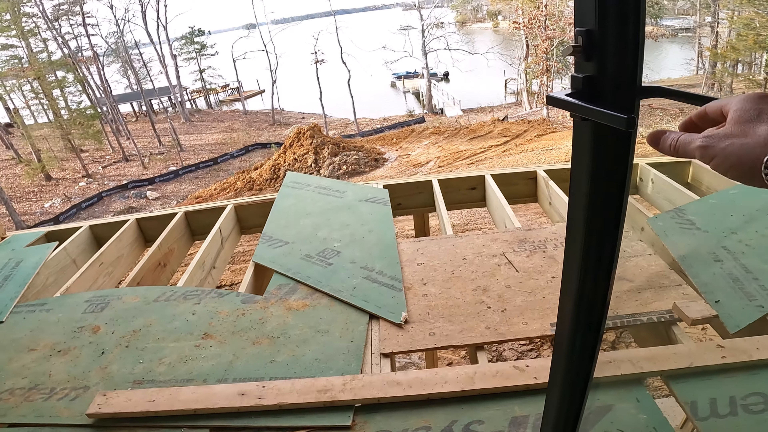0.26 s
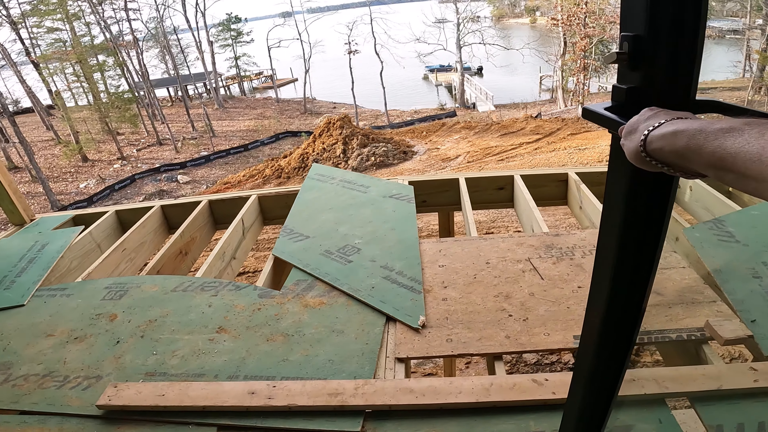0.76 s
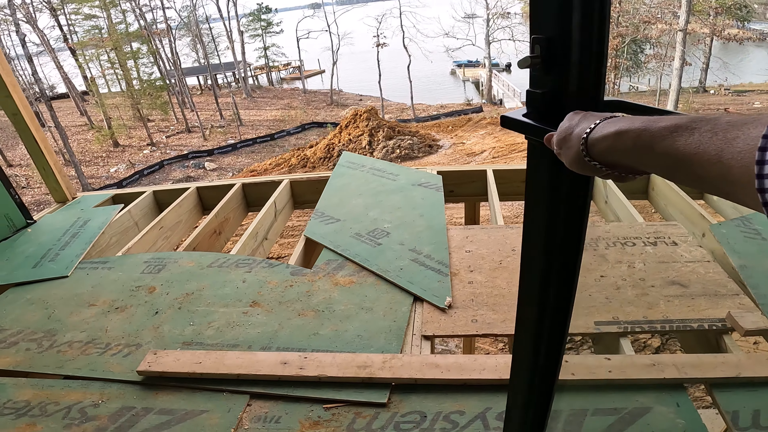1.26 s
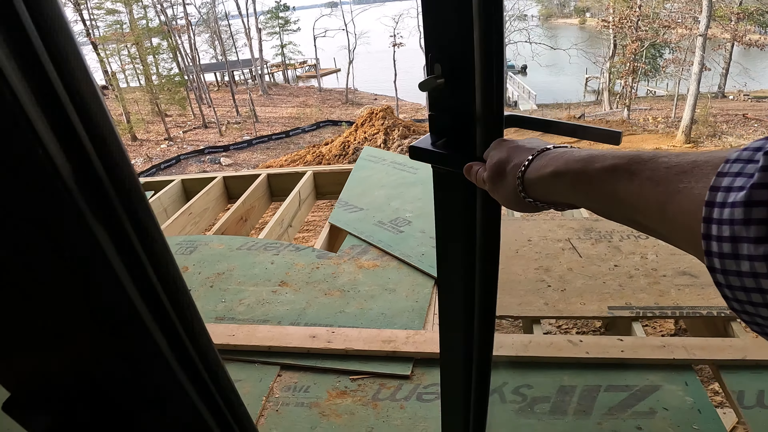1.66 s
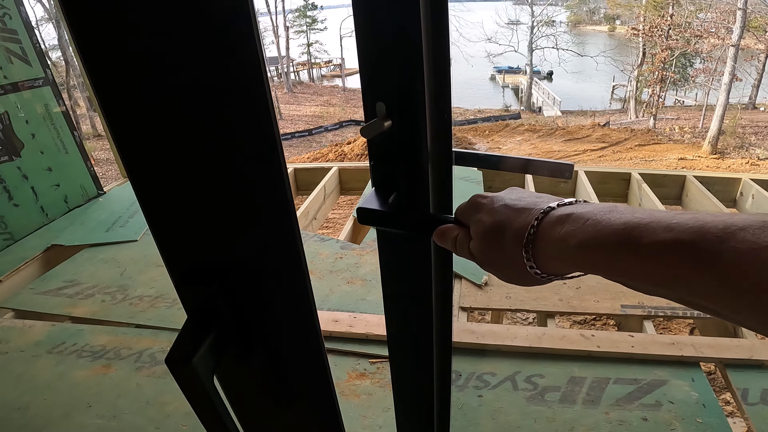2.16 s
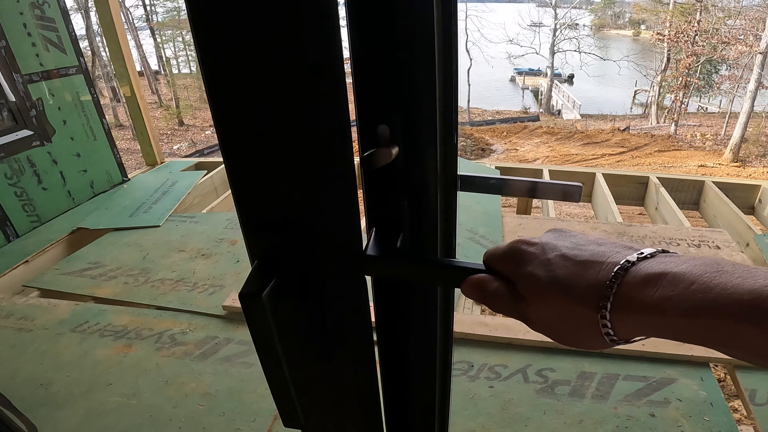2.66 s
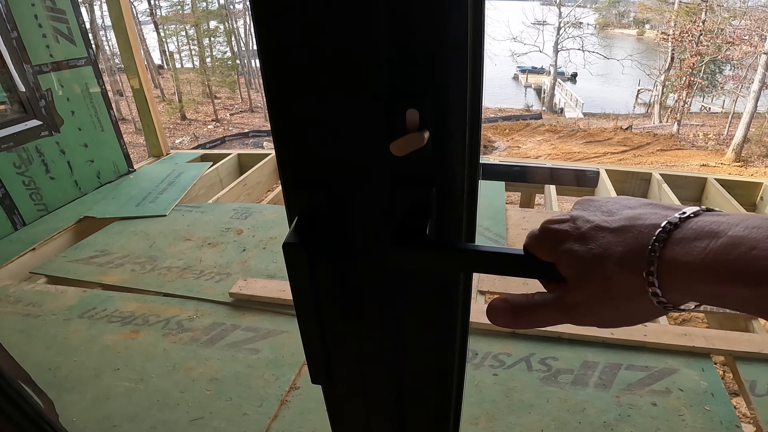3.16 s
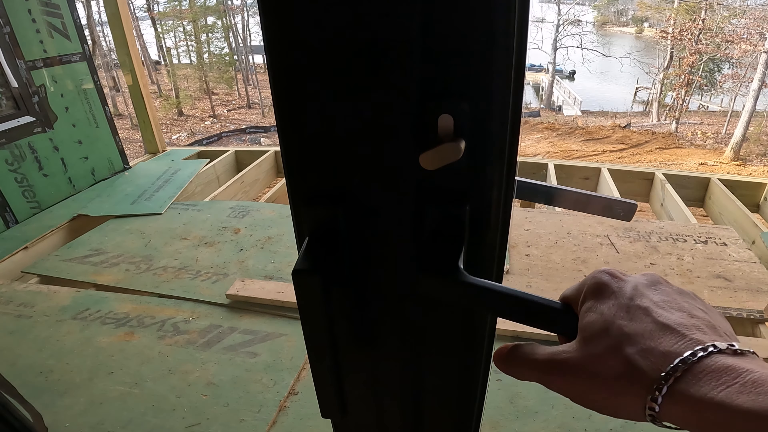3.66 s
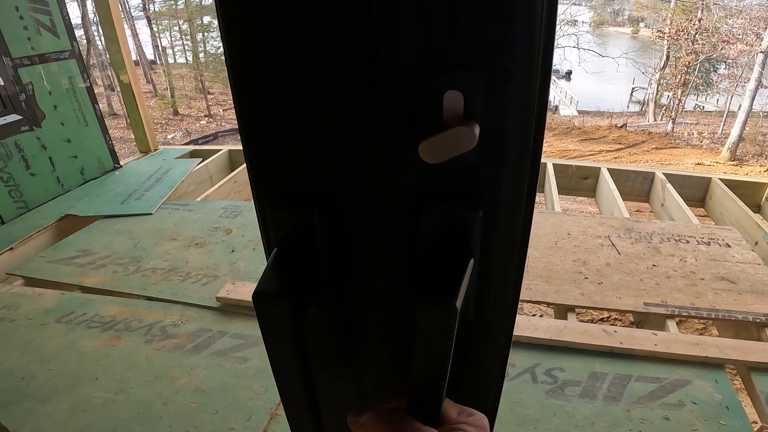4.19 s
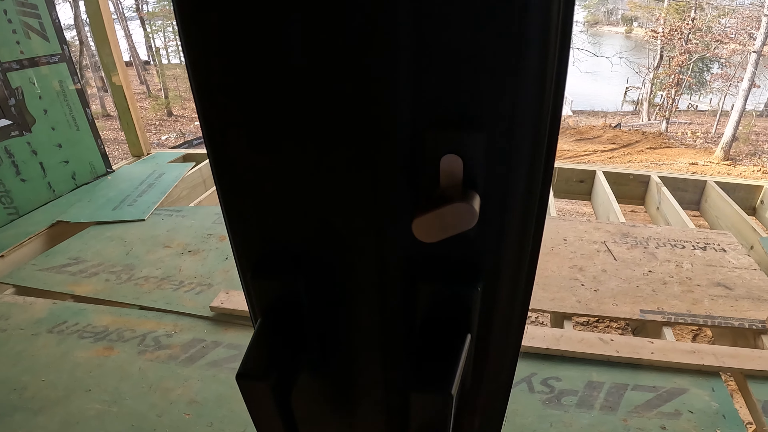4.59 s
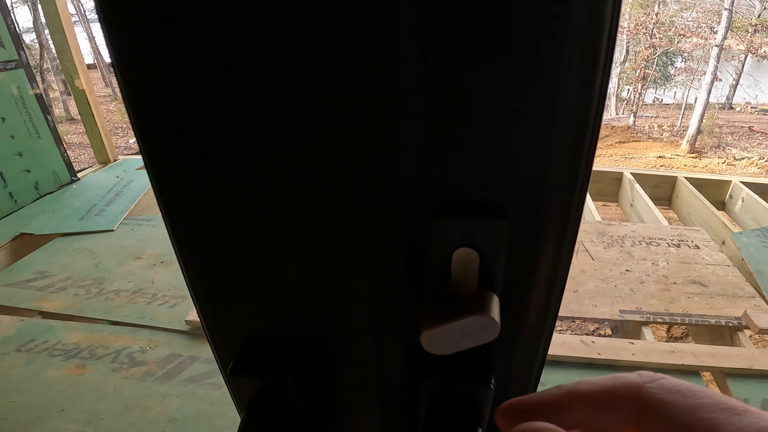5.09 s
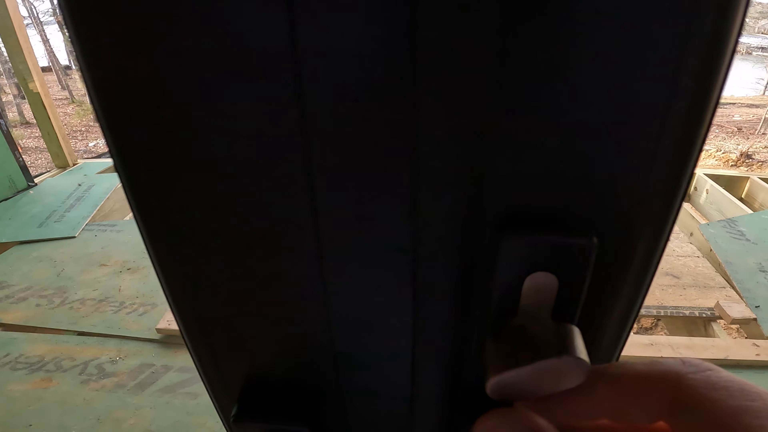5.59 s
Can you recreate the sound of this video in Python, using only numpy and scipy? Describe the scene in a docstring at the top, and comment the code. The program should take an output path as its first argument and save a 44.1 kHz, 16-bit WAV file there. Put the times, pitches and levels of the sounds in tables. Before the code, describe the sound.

A metal door lock handled at close range, with short reflections from bare timber. Mostly quiet at first: a dull bump, small ticks, low hum. One cluster of clicks comes with a gust on the left, then a pause, then a dense burst of hard clacks, knocks and deep thuds. Further thuds and very bright clicks follow, dying into light hand scuffs and loose ticks above a soft hiss.

```python
"""A thud, soft clicks and a scuff open; two faint falling whistles and small dry ticks follow.
At 1.7 s the lock clicks and wind gusts on the left; from 2.7 s a hand works lever and bolt hard: noise
bursts ring the lock, the door thuds and knocks in decaying modes, rods rattle in its panel, skin scuffs
in grains. Bright clicks near 4.25 s give way to late scuffs and ticks. The open timber frame throws back
short reflections, over hissing rustle, low rumble and far engines hummed by wavering sine tones."""
import sys
import numpy as np
from scipy import signal
from scipy.fft import rfft, irfft
from scipy.io import wavfile
from scipy.ndimage import uniform_filter1d

SR = 44100
rng = np.random.default_rng(int(sys.argv[2]) if len(sys.argv) > 2 else 0)


def transcribe(u):
    """Save the signal u as a 16-bit wav file named by the first command-line argument.

    u: samples, shape (n,) or (channels, n), limited to [-1, 1]; the rate is SR.
    q: integer samples, one column per channel.
    """
    v = np.clip(np.atleast_2d(u).T, -1, 1)
    q = np.round(v * 32767).astype(np.int16)
    wavfile.write(sys.argv[1], SR, q)


N = 257544  # samples


def gain_of(db):
    """Decibels to amplitude."""
    return 10 ** (np.asarray(db) / 20)


def evened(x):
    """Scales to rms 1."""
    return x / np.sqrt(np.mean(x ** 2) + 1e-20)


def peaked(x):
    """Scales so that the loudest millisecond peaks near 1."""
    power = uniform_filter1d(x.mean(0) ** 2, size=44)
    return x / (2.5 * np.sqrt(power.max()))


def read(points, hz):
    """Reads a spectrum on a log-frequency axis."""
    f, value = np.transpose(points)
    return np.interp(np.log(hz + 1), np.log(f + 1), value)


def curve(rows, t):
    """Reads every column of an automation table at the times t."""
    s, *columns = np.transpose(rows)
    return [np.interp(t, s, column) for column in columns]


def colour(x, gain):
    """Filters along the last axis by the function gain(hz)."""
    n = x.shape[-1]
    return irfft(rfft(x) * gain(np.fft.rfftfreq(n, 1 / SR)), n)


def step(hz, edge_hz):
    """A soft crossover, 0 below the edge and 1 above."""
    return 1 / (1 + (edge_hz / (hz + 1e-3)) ** 6)


def tilt(hz, db):
    """A slope of db per octave, pivoting about 2 kHz."""
    return gain_of(db * np.log2((hz + 200) / 2200))


def mode(hz, centre_hz, width):
    """One resonance that rings after it is struck, top 1."""
    return 1 / (1 + 2j * (hz - centre_hz) / width)


def mode_bank(hz, modes):
    """Several resonances ringing together, each at its own level."""
    return sum(gain_of(db) * mode(hz, centre_hz, width) for centre_hz, width, db in modes)


def slow(rate, count=N):
    """Slow random drift of rms 1, changing about rate times a second."""
    return evened(colour(rng.standard_normal(count), lambda hz: abs(mode(hz, 0, 2 * rate)) ** 2))


def lumps(per_s, depth, size):
    """A gain of 1 with sparse short peaks of uneven height, size samples long."""
    strikes = rng.random(N) < per_s / SR
    heights = np.minimum(rng.exponential(1, N), 2.2)
    return 1 + depth * size * uniform_filter1d(strikes * heights, size=size)


def pair(same):
    """Two channels of white noise with the given likeness."""
    a, b = rng.standard_normal((2, N))
    return np.array([a, same * a + np.sqrt(1 - same ** 2) * b])


def add(mix, s, sound):
    """Mixes a sound in at s seconds."""
    part = mix[..., round(s * SR):][..., :sound.shape[-1]]
    part += sound[..., :part.shape[-1]]


# lock clicks: (time [s], peak level before the lean [dB], own ring [Hz], tilt [dB per octave], t60 [ms])
LOCK_CLICKS = [(0.158, -38.5, 1030, -3, 68), (0.189, -34.5, 1280, -3, 29), (1.678, -23.5, 1770, -4, 24),
               (1.7325, -13, 1900, -3, 19), (1.7713, -21, 2130, -1.5, 20), (2.728, -32, 1750, -10, 44),
               (2.8913, -22, 1470, -8.5, 35), (2.9405, -28, 1420, -6.5, 53), (2.9827, -15, 2400, -5.5, 16),
               (3.024, -16.5, 980, -11.5, 85), (3.049, -10.5, 990, -1.5, 15),
               (3.0525, -12.5, 1560, -3.5, 38), (3.07, -20.5, 960, -13, 78), (3.121, -15.5, 1840, -10, 45),
               (3.126, -14.5, 960, -11, 81), (3.156, -9.5, 1760, 1.5, 39), (3.3612, -26, 1760, -10.5, 150),
               (3.397, -11, 1700, -1, 23.4), (3.5269, -21, 2200, -7.5, 16), (3.6143, -24, 1540, -8.5, 40),
               (3.67, -23, 1790, -11, 70), (3.782, -35, 1360, -10, 140), (3.89, -37, 1100, -13.5, 160),
               (4.151, -33.5, 1970, -0.5, 18), (4.1778, -32, 1300, -6, 20), (4.2394, -16, 10800, 2, 16),
               (4.2687, -20.5, 11200, 0.5, 15), (4.2843, -27.5, 1440, -6, 21), (4.309, -30, 1330, -14, 40)]
# resonances shared by the lock's parts: (centre [Hz], width [Hz], relative level [dB])
LOCK_MODES = [(990, 42, 3.5), (1974, 46, 2), (3410, 25, -2.5), (3970, 24, -0.5), (6150, 2100, -25),
              (6900, 1800, -13), (10540, 69, 2.5)]
# spectrum of a blow on metal, also under the ticks: (frequency [Hz], relative density [dB per Hz])
BLOW_SPECTRUM = [(240, -42.5), (400, -20.5), (1360, -7), (1570, -6.5), (3100, -4), (7070, -1.5),
                 (8380, -14.5), (12000, -13.5), (15500, -35)]
LOW_LEAN_DB, LOW_CLICK_HZ = 3, 1100  # low clicks, carried by the panel, lean left; high ones sit central


def lock():
    """Each click is a short uneven burst that rings the lock's modes and its own loose part."""
    out, t = np.zeros((2, N)), np.arange(6144) / SR
    late = np.maximum(t - .003, 0)  # silent lead gives the filter's pre-ring room
    rise = 1 - np.exp(-late / 0.0003)
    long_tail = gain_of(-40.0 - 60 * late / 0.27)
    for s, db, ring_hz, tilt_db, t60_ms in LOCK_CLICKS:
        a, b = rng.standard_normal((2, len(t)))
        envelope = rise * (gain_of(-60 * late / (t60_ms / 1000)) + long_tail)
        burst = np.array([a, 0.92 * a + 0.36 * b]) * envelope

        def body(f):
            rings = 0.98 + 3.5 * mode(f, ring_hz, 0.3 * ring_hz) + 1.4 * mode_bank(f, LOCK_MODES)
            return gain_of(read(BLOW_SPECTRUM, f)) * tilt(f, tilt_db) * rings

        lean_db = LOW_LEAN_DB * (1 - step(ring_hz, LOW_CLICK_HZ))  # left over right
        level = gain_of(db + lean_db * np.array([[.5], [-.5]]))
        add(out, s - .004, level * peaked(colour(burst, body)))
    return out


# door thuds: (time [s], level before trim [dB], pitch near which the blow drives the modes [Hz])
DOOR_THUDS = [(0.069, -27, 106), (2.998, -22.5, 156), (3.047, -19.5, 71.4), (3.118, -19, 71.3),
              (3.162, -21, 132), (3.248, -23.5, 66.4), (3.395, -25.5, 148), (3.664, -36.5, 107),
              (4.014, -21.5, 99), (4.178, -29, 128), (4.285, -20, 106), (4.309, -21.5, 150),
              (4.672, -25, 159)]
# low modes of the door: (frequency [Hz], t60 [s])
DOOR_MODES = [(66, 0.2), (108, 0.38), (148, 0.27), (218, 0.23)]
THUD_TRIM_DB, SPREAD_T60_S = -3.5, 0.14
REACH_DB = -40  # loss of a mode an octave from the blow's pitch


def thuds():
    """The panel answers a blow with its low modes and a lumpy spread of higher ones."""
    out, t = np.zeros(N), np.arange(12000) / SR
    hz, t60 = np.transpose(DOOR_MODES)[..., None]
    ringing = gain_of(-60 * t / t60) * np.sin(2 * np.pi * hz * t)
    attack = 1 - np.exp(-t / 0.0013)
    for s, db, blow_hz in DOOR_THUDS:
        share = gain_of(REACH_DB * np.log2(hz / blow_hz) ** 2)
        low_modes = (share / np.linalg.norm(share) * ringing).sum(0)
        noise = rng.standard_normal(len(t))
        spread = evened(colour(noise, lambda f: abs(mode(f, 180, 240)) ** 2 * step(f, 86)))
        spread *= gain_of(1.7 * slow(66, count=len(t)) - 60 * t / SPREAD_T60_S)
        add(out, s, gain_of(db + THUD_TRIM_DB) * (low_modes + 0.54 * spread) * attack)
    return out


# firm, compact knocks on the panel: (time [s], peak level [dB], pitch [Hz])
PANEL_KNOCKS = [(0.0673, -29, 236), (3.003, -21, 258), (3.107, -20.5, 226), (3.165, -20.5, 307),
                (3.579, -33.5, 420), (4.272, -30.5, 200), (4.284, -30.5, 324), (4.919, -27, 226)]
KNOCK_CYCLES = 4.1  # cycles to fall 60 dB


def knocks():
    """A knock is a sharp push and a weaker swing back, a sine that dies in a few cycles."""
    out, t = np.zeros(N), np.arange(2048) / SR
    for s, db, hz in PANEL_KNOCKS:
        push = -np.sin(2 * np.pi * hz * t) * gain_of(-60 * t * hz / KNOCK_CYCLES)
        add(out, s, gain_of(db) * push / abs(push).max())
    return out


# spells of rods rattling inside the panel: (start of full level [s], held [s], level [dB])
RATTLE_SPELLS = [(2.997, 0.2, -35.5), (3.668, 0.027, -42.5)]
# resonances of the panel: (centre [Hz], width [Hz], relative level [dB])
PANEL_MODES = [(390, 140, 6), (1000, 200, 0)]
RATTLE_RISE_DB_PER_S, RATTLE_FALL_DB_PER_S = 357, 165.5


def rattle():
    """Dense uneven knocks ring the panel's modes over a broad wooden body."""
    strikes = pair(.95) * lumps(170, .4, size=260)
    wood = colour(strikes, lambda hz: mode(hz, 650, 1600) ** 2 * (0.13 + mode_bank(hz, PANEL_MODES)))
    t = np.arange(N) / SR
    spells = []
    for s, held, db in RATTLE_SPELLS:
        rise_db = RATTLE_RISE_DB_PER_S * np.maximum(s - t, 0)
        fall_db = RATTLE_FALL_DB_PER_S * np.maximum(t - s - held, 0)
        spells.append(db - rise_db - fall_db)
    return gain_of(np.max(spells, axis=0)) * evened(wood)


# scuffs of the hand, levels before the edge fades:
# (start [s], end [s], start level [dB], end level [dB], tilt [dB per octave], ring of the touched part [Hz])
HAND_SCUFFS = [(0.08, 0.245, -63, -59.5, -3, 1190), (0.21, 0.674, -62.5, -64.5, -8, 2200),
               (1.728, 1.828, -41, -47, -7, 1950), (1.814, 1.899, -48, -44.5, -2, 2500),
               (1.983, 2.054, -38.5, -35.5, -2, 2160), (3, 3.019, -28.5, -40, -9, 2190),
               (3.394, 3.429, -37.5, -26.5, -7.5, 3330), (4.262, 4.347, -42.5, -53, -10, 1410),
               (4.589, 4.697, -61, -52, -3, 2300), (4.687, 4.853, -51.5, -51.5, 0.5, 900),
               (4.922, 4.958, -41, -36.5, -1.5, 680), (5.126, 5.218, -65, -48, 0.5, 1790),
               (5.357, 5.431, -58.5, -36.5, 0, 873)]
# spectrum of skin on the panel: (frequency [Hz], relative density [dB per Hz])
SKIN_SPECTRUM = [(180, -19), (300, -4.5), (528, -13), (961, -8), (1780, -7.5), (2250, -6.5), (3890, -3),
                 (12300, -21.5), (16000, -56)]
SCUFF_RING, SCUFF_RING_WIDTH = 1.8, .22  # height and relative width of the touched part's ring


def scuffs():
    """Skin sticks and slips in dense uneven grains whose colour shifts in patches; the touched part rings."""
    grains = pair(0.85) * gain_of(0.74 * slow(240)) * lumps(78, 0.51, size=50)
    z = signal.stft(grains, nperseg=256)[2]
    patches = uniform_filter1d(rng.standard_normal(z.shape[1:]), size=5, axis=0)
    patches = uniform_filter1d(patches, size=5, axis=1)
    grains = signal.istft(z * gain_of(2.5 * evened(patches)), nperseg=256)[1]
    out = np.zeros((2, N))
    for start, end, start_db, end_db, tilt_db, ring_hz in HAND_SCUFFS:

        def touch(hz):
            ring = 1 + SCUFF_RING * mode(hz, ring_hz, SCUFF_RING_WIDTH * ring_hz)
            return gain_of(read(SKIN_SPECTRUM, hz)) * tilt(hz, tilt_db) * ring

        # about 9 ms longer and 8 ms early, to leave room for the fades
        stroke = evened(colour(grains[:, round(start * SR):round(end * SR) + 400], touch))
        n = stroke.shape[1]
        level = gain_of(np.linspace(start_db, end_db, n))
        add(out, start - .008, level * stroke * signal.windows.tukey(n, .45))
    return out


# small dry ticks of loose parts: (time [s], peak level before the lean [dB], ring [Hz])
LOOSE_TICKS = [(0.105, -48, 3880), (0.172, -39, 5150), (0.365, -51, 4400), (0.883, -53, 2320),
               (0.912, -51, 2260), (0.952, -55, 2190), (1.051, -48.5, 4640), (1.152, -43, 2240),
               (1.21, -50, 2260), (1.263, -49, 2350), (1.411, -55.5, 2360), (1.954, -42, 5600),
               (2.868, -48.5, 3000), (2.964, -38, 3380), (3.034, -27.5, 6060), (3.244, -28, 638),
               (3.579, -47, 2630), (3.721, -37.5, 5100), (3.802, -45, 3800), (3.926, -43.5, 2960),
               (3.846, -42.5, 3500), (3.878, -41, 4130), (4.104, -44.5, 4300), (4.136, -43.5, 6300),
               (4.235, -26.5, 6700), (4.369, -42.5, 2610), (4.563, -49, 3000), (4.646, -37, 2320),
               (4.665, -46, 4230), (4.683, -41, 1470), (4.714, -43, 3500), (5.053, -39, 4200)]


def ticks():
    """Short noise through one ring, slightly toward the right; higher ticks are broader and shorter."""
    out, t = np.zeros((2, N)), np.arange(1024) / SR
    for s, db, hz in LOOSE_TICKS:
        burst = rng.standard_normal(len(t)) * gain_of(-60 * t * hz / 55)
        tick = colour(burst, lambda f: mode(f, hz, hz ** 2 / 6000) ** 2
                      + hz / 50000 * gain_of(read(BLOW_SPECTRUM, f)))
        add(out, s - .001, gain_of(db) * peaked(tick * gain_of([[-.6], [.6]])))
    return out


# reverberation of the frame: (frequency [Hz], t60 [s])
FRAME_DECAY = [(200, 0.36), (1500, 0.52), (6000, 0.4), (14000, 0.22)]


def reflections():
    """Sparse taps of random sign, each band dying at its own speed; the bass reaches both sides alike."""
    taps = np.zeros((2, SR // 2))
    jitter = rng.integers(0, 20, (2, (SR // 2 - 201) // 20))
    at = np.arange(200, SR // 2 - 20, 20) + jitter  # one tap in every 20 samples
    np.put_along_axis(taps, at, rng.choice([-1., 1.], at.shape), 1)
    side = 0.52 * colour(taps[1], lambda hz: step(hz, 400))
    stereo = np.array([taps[0] + side, taps[0] - side])
    hz, t, z = signal.stft(stereo, SR, nperseg=256)
    fall = gain_of(-60 * t / read(FRAME_DECAY, hz)[:, None])
    tail = signal.istft(z * fall, SR, nperseg=256)[1]
    return tail / np.linalg.norm(tail[0])


def room(x, count=6):
    """Echoes the sound through count sets of reflections, switched so that no fixed ringing colours it."""
    turn = np.arange(N) // 30 % count  # the set changes every 30 samples; one set is a plain echo
    out = np.zeros((2, N))
    for k in range(count):
        slices = (x * (turn == k))[None]
        out += signal.fftconvolve(slices, reflections(), axes=1)[:, :N]
    return out


# two overlapping falling notes: (start [s], length [s], from [Hz], to [Hz], level before fuzz and fades [dB])
FALLING_WHISTLES = [(0.409, 0.18, 3520, 2460, -66), (0.496, 0.13, 2930, 2230, -66)]


def whistles():
    """Each faint, fuzzy, broken whistle holds, slides down and levels off."""
    out = np.zeros(N)
    for start, length, from_hz, to_hz, db in FALLING_WHISTLES:
        t = np.arange(0, length, 1 / SR)
        hz = to_hz + (from_hz - to_hz) * np.exp(-(2 * t / length) ** 2)
        tone = np.sin(2 * np.pi * np.cumsum(hz) / SR)
        fuzz = slow(260, count=len(t)) * gain_of(2 * slow(30, count=len(t)))
        add(out, start, gain_of(db) * signal.windows.tukey(len(t), .5) * fuzz * tone)
    return out


# rustle of air, cloth and loose lock parts, below the split and before flicker: (time [s], level [dB])
RUSTLE_LEVEL = [(0.0, -67), (0.21, -63), (1.54, -69), (1.9, -53), (2.26, -70), (2.75, -76), (2.93, -56),
                (3.09, -50), (4.06, -60.5), (4.62, -69.5), (4.83, -61.5), (5.84, -72.5)]
# spectrum of the rustle: (frequency [Hz], relative density [dB per Hz])
AIR_SPECTRUM = [(240, -18), (400, 6.5), (588, -5), (742, -11), (1330, -3), (1560, -6.5), (2800, -23.5),
                (3640, -29.5), (10200, -40), (12900, -50.5), (16000, -63.5)]
SPLIT_HZ = 3200
TREBLE_DB, TREBLE_SHARE = -72.5, 0.63  # treble level when the rustle is at -65 dB, and how far it follows


def rustle():
    """A flickering, wide hiss whose treble follows the lower part only in part."""
    hiss = colour(pair(0.41), lambda hz: gain_of(read(AIR_SPECTRUM, hz)))
    treble = colour(hiss, lambda hz: step(hz, SPLIT_HZ))
    low_db = curve(RUSTLE_LEVEL, np.arange(N) / SR)[0]
    treble_db = TREBLE_DB + TREBLE_SHARE * (low_db + 65)
    flicker = gain_of(0.66 * slow(21) + [[.2], [-.2]])  # a hair stronger left
    return (gain_of(low_db) * evened(hiss - treble) + gain_of(treble_db) * evened(treble)) * flicker


# shaking: (time [s], level of about 22-108 Hz [dB], level above that before lift and drift [dB])
SHAKE_LEVEL = [(0.0, -112, -56), (0.1, -34.5, -54), (0.36, -53.5, -58), (1.89, -47, -54), (2.65, -55, -65),
               (2.93, -46.5, -54), (3.09, -21.5, -52.5), (3.71, -42.5, -48.5), (4.0, -30, -51),
               (4.5, -38.5, -57.5), (4.94, -45, -60), (5.84, -46.5, -59.5)]
# spectrum of the rumble: (frequency [Hz], relative density [dB per Hz])
LOW_SPECTRUM = [(3.5, -33), (6.0, 6.5), (16, -11.5), (29, -4.5), (96, -19), (151, -17.5), (212, -25),
                (269, -26.5), (700, -57), (1540, -120)]
SWAY_DB, SWAY_SHARE = -36, 0.15  # sway before its lean with the shaking at -45 dB; how far it follows
WIND_DB, GUST_DB = -56, 15  # steady wind before its lean, and the rise at the gust
GUST_S, GUST_LENGTH_S = 1.727, 0.16  # gust centre and spread


def shake():
    """Lumpy low rumble, nearly alike on both sides; the slowest sway is stronger right, wind left."""
    t = np.arange(N) / SR
    deep_db, body_db = curve(SHAKE_LEVEL, t)
    noise = colour(pair(0.99), lambda hz: gain_of(read(LOW_SPECTRUM, hz)))
    sway = colour(noise, lambda hz: 1 - step(hz, 22))
    body = colour(noise, lambda hz: step(hz, 107.7))
    deep = noise - sway - body
    sway_db = SWAY_DB + SWAY_SHARE * (deep_db + 45)
    rumble = gain_of(sway_db + [[-2.8], [2.4]]) * evened(sway)
    rumble += gain_of(deep_db) * evened(deep)
    rumble += gain_of(body_db + 3.5 + 2. * slow(2.8)) * evened(body)
    wind = colour(rng.standard_normal(N), lambda hz: abs(mode(hz, 30, 130)) ** 2 * step(hz, 18))
    wind_db = WIND_DB + GUST_DB * np.exp(-((t - GUST_S) / GUST_LENGTH_S) ** 2)
    return rumble + gain_of(wind_db) * evened(wind) * [[1.5], [.3]]


# far engines, one row a tone:
# (pitch [Hz], loudest at [s], top rms level before drift [dB], swell [dB per s], fade [dB per s squared])
ENGINE_TONES = [(158.9, 0.22, -48.5, 30, 2.5), (314, 1.19, -57, 8.5, 41), (186.6, 0.94, -60.5, 4, 25.5),
                (138.7, 5.1, -48, 3, 0.5)]


def engines():
    """Steady tones swell and fade, wavering a little in pitch and level on their way through the air."""
    t, out = np.arange(N) / SR, np.zeros(N)
    for hz, top_s, db, swell, fade in ENGINE_TONES:
        turns = np.cumsum(hz * (1 + .001 * slow(2))) / SR
        loss_db = np.where(t < top_s, swell * (top_s - t), fade * (t - top_s) ** 2)
        out += gain_of(db - loss_db + slow(3)) * np.sqrt(2) * np.sin(2 * np.pi * turns)
    return out


LEFT_LAG_S = 1.1e-5  # the lock is a little nearer the right side


def scene():
    """Mixes all sources; the frame throws back the door's sounds, all but the rattle."""
    bright = lock() + ticks() + scuffs()
    low = thuds() + knocks()
    lag_s = LEFT_LAG_S * np.array([[1], [0]])
    door = colour(bright + low, lambda hz: np.exp(-2j * np.pi * hz * lag_s))
    thrown_back = gain_of(-10.0) * (room(bright.mean(0)) + room(low, count=1))
    return door + thrown_back + rattle() + whistles() + rustle() + shake() + engines()


def record(dry):
    """Limits the band with a steep low-pass at 16.3 kHz."""
    low_pass = signal.firwin(511, 16300, window=("kaiser", 9), fs=SR)
    return signal.oaconvolve(dry, low_pass[None], "same")


dry = scene()
out = record(dry)
transcribe(out)
```